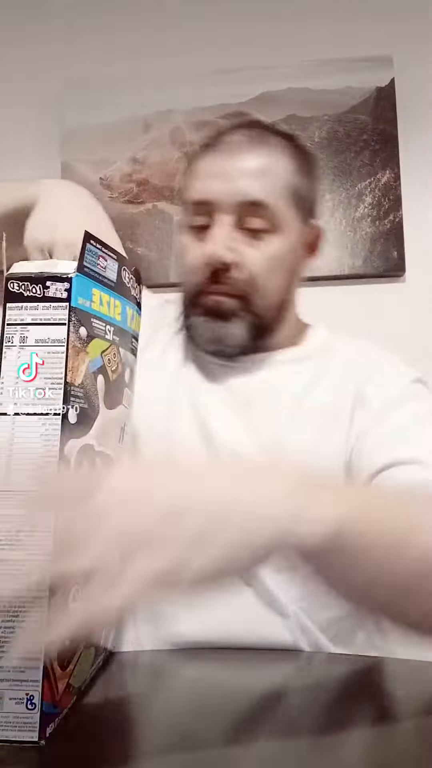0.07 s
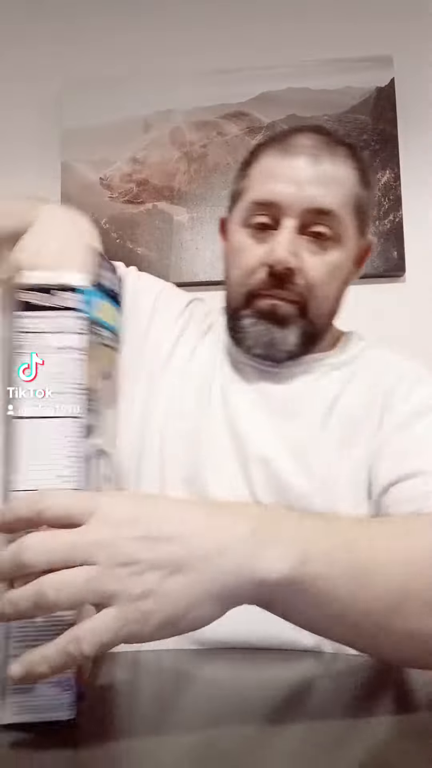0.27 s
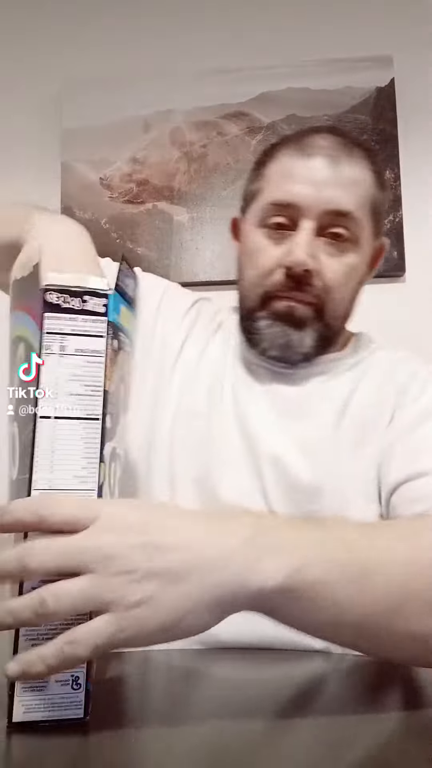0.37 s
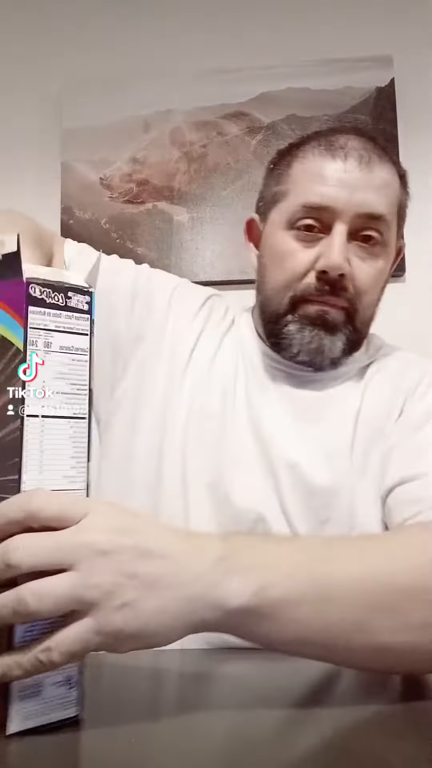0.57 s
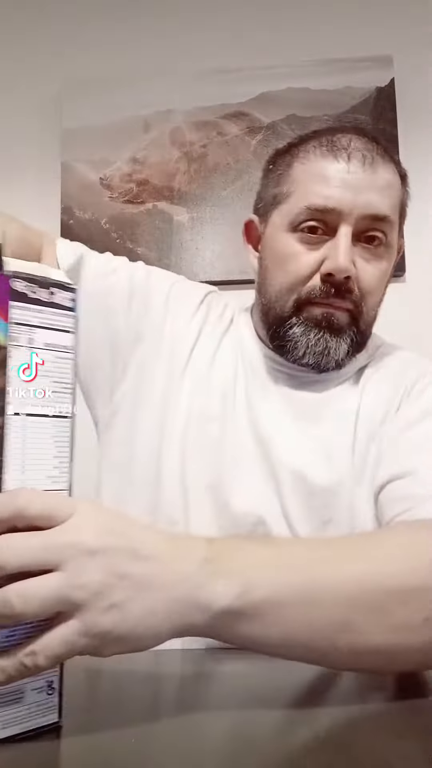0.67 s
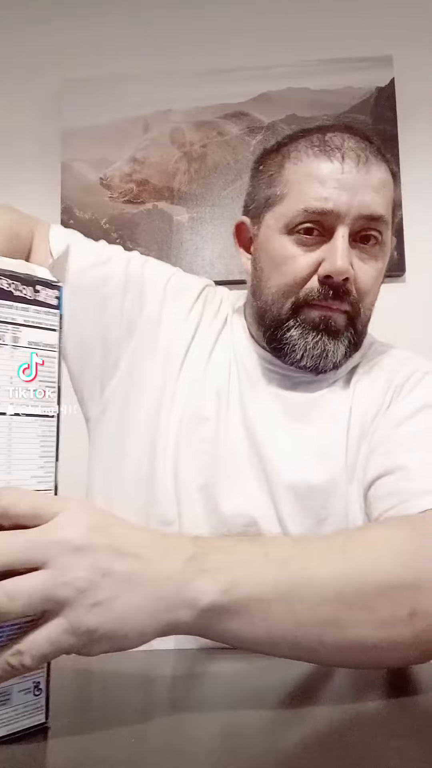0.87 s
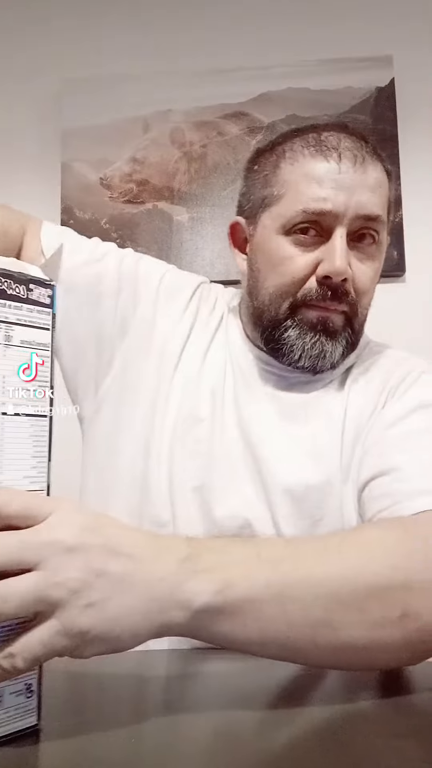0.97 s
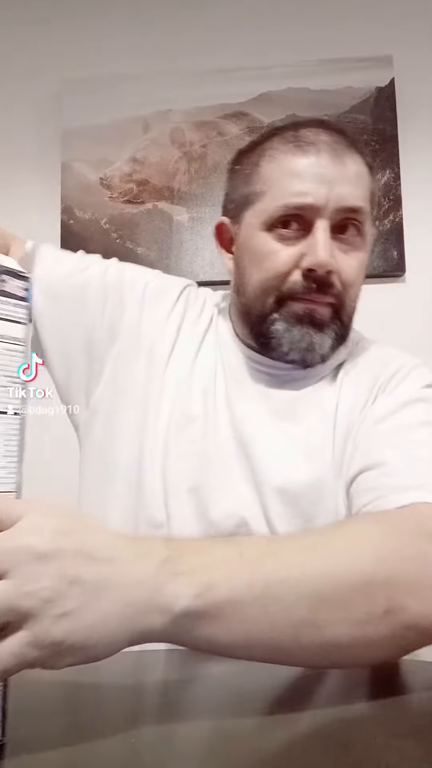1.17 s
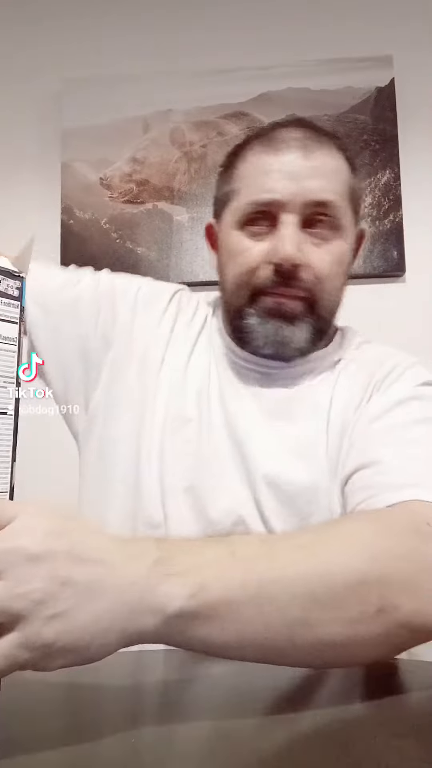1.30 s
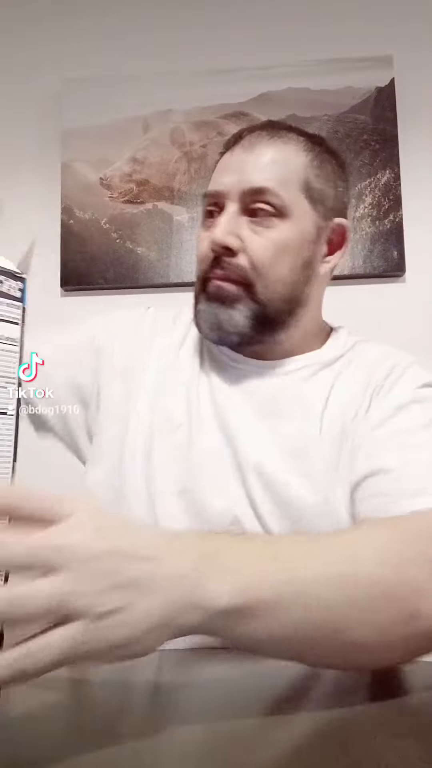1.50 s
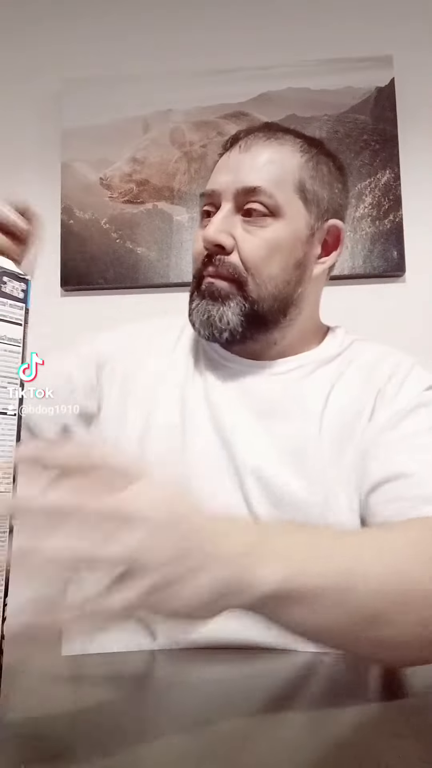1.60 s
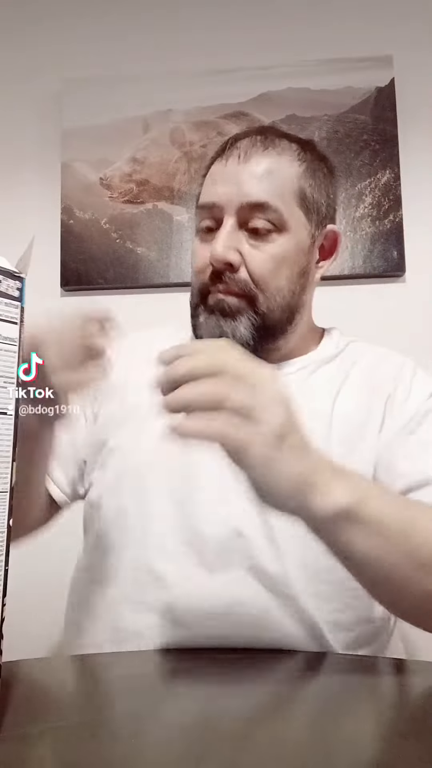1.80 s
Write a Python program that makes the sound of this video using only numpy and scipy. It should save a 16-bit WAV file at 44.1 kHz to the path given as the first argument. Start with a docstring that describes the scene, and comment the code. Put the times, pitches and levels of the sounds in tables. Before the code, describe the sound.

A hand digs through a cereal box, crackling the inner bag and bumping the carton.

```python
"""A cardboard cereal box on a table in a small, quiet room, close to a near-mono stereo microphone.
A hand goes into the plastic liner: creases buckle in a running crackle, cereal patters on the walls
and larger creases snap over. As the hand rummages, the box thuds on the table, cereal and knuckles
bump the carton, and the room rings briefly. By about 1.6 s the hand has pulled out.
Last, something small and hard ticks faintly."""
import sys
import numpy as np
from scipy import signal
from scipy.fft import rfft, irfft
from scipy.io import wavfile
from scipy.ndimage import uniform_filter1d

SR = 44100
rng = np.random.default_rng(int(sys.argv[2]) if len(sys.argv) > 2 else 0)


def generate_wav(signal):
    """Clip the signal to [-1, 1] and save it as 16-bit WAV at the path in sys.argv[1]."""
    frames = np.transpose(np.atleast_2d(signal))
    scaled = np.clip(frames, -1, 1) * 32767
    pcm = np.round(scaled).astype(np.int16)
    wavfile.write(sys.argv[1], SR, pcm)


N = 81585


def undb(db):
    """Decibels to gain."""
    return 10 ** (np.asarray(db) / 20)


def unit(x):
    """Scale to rms 1."""
    return x / np.sqrt(np.mean(x ** 2))


def unit_attack(sound):
    """Scale a short sound to rms 1 over its first 4 ms."""
    return sound / np.sqrt(np.mean(sound[:176] ** 2))


def envelope(table, column):
    """Gain over time from one dB column of a table."""
    rows = np.array(table)
    return undb(np.interp(np.arange(N) / SR, rows[:, 0], rows[:, column]))


def fade(t, t60):
    """Exponential decay by 60 dB in t60."""
    return np.exp(-np.log(1000) * t / t60)


def ring(x, response):
    """Pass a sound through an impulse response scaled to unit energy."""
    return signal.fftconvolve(x, response / np.linalg.norm(response))[:N]


def bin_gains(points, size):
    """Gain at each FFT bin from (frequency [Hz], level [dB]) points."""
    hz, db = np.array(points).T
    return undb(np.interp(np.log(np.fft.rfftfreq(size, 1 / SR) + 1), np.log(hz), db))


def colour(x, points, size=4096):
    """Minimum-phase filter with the spectral shape of the points."""
    cepstrum = irfft(np.log(bin_gains(points, size)))
    cepstrum[1:size // 2] *= 2
    cepstrum[size // 2 + 1:] = 0
    return ring(x, irfft(np.exp(rfft(cepstrum))))


def add(track, start, sound):
    """Mix a sound in at a time in seconds."""
    i = int(np.clip(start * SR, 0, N - 1))
    track[i:i + len(sound)] += sound[:N - i]


def steady(x, size=1100):
    """Hold the average strength near 1 and keep the fine grain."""
    power = np.abs(uniform_filter1d(uniform_filter1d(x ** 2, size), size // 2))
    return x / np.sqrt(power + np.mean(x ** 2) / 20)


def room(x, wet_db, t60=.28, gap_s=.006, patterns=16):
    """Direct sound at the microphone, then a small room whose echoes shift as the hand moves."""
    t, place = np.arange(N // 4) / SR, np.linspace(0, patterns - 1, N)
    tail = fade(t, t60) * (t > gap_s)
    wet = np.zeros(N)
    for k in range(patterns):
        crossfade = np.sqrt(np.maximum(1 - np.abs(place - k), 0))
        wet += ring(x * crossfade, rng.standard_normal(len(t)) * tail)
    return (x + undb(wet_db) * wet) / np.hypot(1, undb(wet_db))


# Spectrum of the background at the microphone (frequency [Hz], relative level [dB])
ROOM_TONE_SPECTRUM = [(25, -7), (70, 1.5), (130, 0), (250, 5.5), (450, -3.5), (1000, -15), (5000, -14),
                      (8000, -30.5), (12500, -7), (16000, -15.5)]


def room_tone(level_db=-78.5):
    """The quiet room: a steady low murmur with a thin hiss."""
    return undb(level_db) * colour(rng.standard_normal(N), ROOM_TONE_SPECTRUM)


# Rustle of the liner around the hand (time [s], relative crunch level [dB], relative treble level [dB])
RUSTLE_LEVELS = [(0, -61.5, -62), (0.04, -55, -59.5), (0.1, -45.5, -40), (0.18, -53.5, -57),
                 (0.25, -43.5, -43), (0.295, -30.5, -32.5), (0.39, -33, -32), (0.49, -38.5, -39.5),
                 (0.57, -33.5, -30), (0.635, -27.5, -38), (0.68, -32, -31.5), (0.735, -30, -25.5),
                 (0.83, -40, -49), (0.91, -38, -37), (1.0, -44.5, -44.5), (1.05, -49, -47),
                 (1.1, -46.5, -50.5), (1.23, -40, -42.5), (1.3, -37.5, -45), (1.355, -48.5, -41),
                 (1.42, -26.5, -29.5), (1.46, -45.5, -48), (1.505, -70, -43), (1.55, -46.5, -76.5),
                 (1.63, -78, -87.5)]


def crackle(per_s=1500, spread_db=2.8, t60=.008, count=4000, size=500):
    """Many small creases buckle, each a brief burst of its own strength; gives crunch and treble."""
    grain, t = np.zeros(N), np.arange(size) / SR
    starts = np.cumsum(rng.exponential(size=count)) / per_s
    strengths = undb(spread_db * np.minimum(rng.exponential(size=count), 4))
    bursts = rng.standard_normal((count, size)) * fade(t, t60)
    for start, strength, burst in zip(starts, strengths, bursts):
        if start < N / SR:
            add(grain, start, burst * strength)
    grain = steady(grain)
    crunch = grain * envelope(RUSTLE_LEVELS, column=1) * undb(-4)
    treble = grain * envelope(RUSTLE_LEVELS, column=2) * undb(-5)
    return crunch, treble


# Jostling of the box (time [s], relative patter level [dB], rumble level [dB])
JOSTLE_LEVELS = [(0, -66, -69), (0.1, -44, -74), (0.185, -54.5, -66), (0.22, -43.5, -64), (0.3, -32, -42),
                 (0.41, -34.5, -50.5), (0.48, -31.5, -44), (0.58, -30, -40), (0.64, -32, -42),
                 (0.685, -34.5, -47), (0.73, -22.5, -40), (0.79, -37.5, -49), (0.89, -34, -41),
                 (0.96, -36.5, -52), (1.03, -33, -46.5), (1.1, -44, -51), (1.2, -36, -63),
                 (1.3, -40.5, -53.5), (1.43, -35.5, -60), (1.51, -38, -46), (1.56, -60, -65),
                 (1.65, -82.5, -81)]
# Spectrum of the cardboard walls (frequency [Hz], relative level [dB])
WALL_SPECTRUM = [(70, -45.5), (170, -8.5), (240, -8.5), (320, 0), (480, 2), (700, 2), (1000, -1.5),
                 (1400, -9), (3000, -12), (8000, -41.5)]
# A low room mode at 137 Hz, then the box's own modes (frequency [Hz], relative level [dB], t60 [s])
ROOM_AND_BOX_MODES = [(137, -12, .35), (246, -12, .12), (402, -9, .1), (494, -9, .1), (568, -10, .13),
                      (652, -11, .13), (702, -11, .13), (905, -11, .13)]
# The table's rumble, with the room mode's peak at 137 Hz (frequency [Hz], relative level [dB])
RUMBLE_SPECTRUM = [(25, -25.5), (45, -4), (65, -4), (90, -2), (108, -10.5), (122, -12), (137, 6.5),
                   (150, -6), (170, -12), (230, 3.5), (320, -8.5), (1000, -81)]


def jostle(hits_per_s=600, spread_db=2.5, modes_db=-8):
    """Cereal patters on the walls, ringing the box and a low room mode; the table rumbles under it."""
    strengths = undb(spread_db * np.minimum(rng.exponential(size=N), 4))
    hits = (rng.random(N) < hits_per_s / SR) * strengths * rng.choice([-1, 1], N)
    patter = steady(hits) * envelope(JOSTLE_LEVELS, column=1) * undb(-3.5)
    t = np.arange(N // 3) / SR
    modes = sum(undb(db) * unit(np.sin(2 * np.pi * hz * t) * fade(t, t60))
                for hz, db, t60 in ROOM_AND_BOX_MODES)
    rattle = colour(patter, WALL_SPECTRUM) + undb(modes_db) * ring(patter, modes)
    rumble = colour(rng.standard_normal(N), RUMBLE_SPECTRUM) * envelope(JOSTLE_LEVELS, column=2)
    return room(rattle, wet_db=-3) + rumble


# Larger creases snapping over
# (time [s], relative crunch level [dB], relative treble level [dB], pitch of the film patch [Hz])
CREASE_SNAPS = [(0.087, -40.5, -46, 3060), (0.155, -55, -52, 3800), (0.199, -39.5, -48, 6580),
                (0.208, -40, -34, 4860), (0.215, -41.5, -37.5, 2310), (0.267, -29.5, -33, 2230),
                (0.307, -30.5, -31, 5000), (0.402, -47, -44, 1630), (0.424, -34.5, -32, 4600),
                (0.453, -33.5, -38, 2170), (0.526, -28, -33.5, 3200), (0.55, -43, -32.5, 3400),
                (0.555, -36, -38, 2090), (0.581, -28, -37, 1780), (0.591, -48, -26.5, 1880),
                (0.613, -28.5, -31, 2190), (0.618, -50, -25.5, 4660), (0.627, -28.5, -24, 3050),
                (0.63, -50, -26, 1870), (0.669, -40, -32, 2170), (0.683, -37, -45.5, 1780),
                (0.705, -28, -45, 2470), (0.726, -26, -27, 4700), (0.735, -57, -26.5, 1630),
                (0.762, -36, -30, 5700), (0.776, -32, -39, 4260), (0.785, -34, -31, 3070),
                (0.793, -25, -26.5, 5950), (0.797, -39, -33, 1860), (0.857, -27.5, -34, 4230),
                (0.899, -31.5, -53, 1730), (0.909, -46, -33, 1750), (0.917, -33, -36.5, 4600),
                (0.95, -34.5, -47, 1510), (0.959, -35, -41, 2110), (0.97, -35.5, -40.5, 2970),
                (1.026, -38, -39, 1840), (1.036, -31.5, -37, 1680), (1.043, -41, -36, 5300),
                (1.12, -37.5, -61, 1580), (1.143, -39, -43, 3270), (1.204, -40, -37.5, 3970),
                (1.211, -32.5, -36.5, 4200), (1.236, -34, -42, 1830), (1.284, -37, -41, 1490),
                (1.327, -32, -43, 2150), (1.371, -27, -34, 1860), (1.379, -53, -47, 5870),
                (1.397, -28, -26, 3070), (1.407, -33, -40, 2240), (1.409, -53, -27, 2180),
                (1.437, -46, -46, 2180), (1.478, -38, -44, 1640), (1.488, -34, -42.5, 3690),
                (1.604, -90, -60, 3200), (1.748, -75, -76, 5780)]


def snaps(rise_s=.0005, hold_s=.0025, t60=.009, ring_t60=.018, spread_db=.8, size=1300):
    """Each snap is a quick avalanche of clicks that rings a patch of film."""
    crunch, treble, rings = np.zeros((3, N))
    t = np.arange(size) / SR
    rise = 1 - np.exp(-t / rise_s)
    shape = rise * fade(np.maximum(t - hold_s, 0), t60)
    for start, crunch_db, treble_db, hz in CREASE_SNAPS:
        avalanche = rng.standard_normal(size) * undb(spread_db * rng.exponential(size=size))
        snap = unit_attack(shape * avalanche)
        add(crunch, start, snap * undb(crunch_db - .5))
        add(treble, start, snap * undb(treble_db + 1.5))
        partials_hz = rng.uniform(2000, 6000, size=(3, 1))
        patch = np.sin(2 * np.pi * hz * t) + .5 * np.sin(2 * np.pi * partials_hz * t).sum(axis=0)
        add(rings, start, unit_attack(patch * rise * fade(t, ring_t60)) * undb(crunch_db - 5))
    return crunch, treble, rings


# Spectrum of the liner's crunch (frequency [Hz], relative level [dB])
CRUNCH_SPECTRUM = [(500, -32), (900, -2.5), (1300, -1.5), (1700, 5), (2800, -1), (4500, 2), (6300, 0.5),
                   (7000, -7.5), (7700, -20.5), (9500, -25.5), (16000, -44)]
# Spectrum of the liner's fine treble crackle (frequency [Hz], relative level [dB])
TREBLE_SPECTRUM = [(4000, -20.5), (7500, -25.5), (9000, -13.5), (10500, -7), (11700, -0.5), (12600, 0.5),
                   (14000, -5.5), (16000, -16.5)]


def liner():
    """Crackle and snaps take on the colour of the plastic film and spread into the room."""
    crackle_crunch, crackle_treble = crackle()
    snap_crunch, snap_treble, rings = snaps()
    crunch = colour(crackle_crunch + snap_crunch, CRUNCH_SPECTRUM)
    treble = colour(crackle_treble + snap_treble, TREBLE_SPECTRUM)
    return room(crunch + rings, wet_db=-4) + room(treble, wet_db=-6.5)


# The base of the box landing on the table (time [s], peak level before the low cut [dB])
BASE_THUDS = [(0.214, -42), (.29, -63), (0.496, -39), (.625, -57), (.755, -45), (1.03, -35.5),
              (1.41, -41.5)]


def thuds(hz=80, rise_s=.002, t60=.027, size=5000):
    """The carton rocks on its base and thuds softly on the table."""
    out, t = np.zeros(N), np.arange(size) / SR
    thud = np.sin(2 * np.pi * hz * t) * (1 - np.exp(-t / rise_s)) ** 2 * fade(t, t60)
    for start, db in BASE_THUDS:
        add(out, start, undb(db) * thud / np.abs(thud).max())
    return out


# Cereal and knuckles against the carton (time [s], relative level [dB], wall pitch [Hz], t60 [s])
WALL_BUMPS = [(0.223, -35, 247, 0.06), (.292, -26, 550, 0.045), (.458, -27.5, 335, 0.049),
              (0.4893, -24, 450, 0.075), (.499, -14, 428, 0.018), (0.531, -29, 500, 0.026),
              (.62, -24.5, 535, 0.042), (0.643, -21.5, 316, 0.044), (.708, -21.5, 516, 0.0085),
              (.723, -32, 566, 0.033), (0.749, -27.5, 420, 0.036), (.785, -28, 818, 0.09),
              (.867, -38, 730, 0.036), (0.904, -41, 237, 0.12), (.968, -30, 640, 0.034),
              (1.021, -28.5, 436, 0.0091), (1.169, -26, 512, 0.018), (1.188, -28, 540, 0.015),
              (1.289, -29.5, 235, 0.062), (1.333, -26.5, 280, 0.027), (1.37, -27, 446, 0.023)]


def bumps(scuff_db=-8, bass_cut_hz=170, size=3000):
    """A bump flexes a heavily damped wall, with a short scuff; the small wall radiates little bass."""
    out, t = np.zeros(N), np.arange(size) / SR
    bass_cut = signal.butter(1, bass_cut_hz, "high", fs=SR)
    for start, db, hz, t60 in WALL_BUMPS:
        scuff = unit(colour(rng.standard_normal(size), WALL_SPECTRUM)[:size])
        flex = (np.sin(2 * np.pi * hz * t) + undb(scuff_db) * scuff) * fade(t, t60)
        add(out, start, undb(db - 3.5) * unit_attack(signal.lfilter(*bass_cut, flex)))
    return room(out, wet_db=-7.5)


# Spectrum of the last tick (frequency [Hz], relative level [dB])
TICK_SPECTRUM = [(500, -22.5), (1400, -20.5), (2050, -0.5), (2600, -14), (3200, -1), (4100, 5.5),
                 (4700, -4), (5800, -4.5), (7500, -24), (12000, -30), (16000, -35.5)]


def tick(start_s=1.797, level_db=-62, t60=.06, size=5000):
    """Something small and hard ticks faintly, with nearly as much room as direct sound."""
    out, t = np.zeros(N), np.arange(size) / SR
    burst = colour(rng.standard_normal(size) * fade(t, t60), TICK_SPECTRUM)
    add(out, start_s, undb(level_db) * unit_attack(burst))
    return room(out, wet_db=-1)


# Side level by frequency (frequency [Hz], level relative to mid [dB])
STEREO_WIDTH = [(100, -37.5), (500, -23), (1000, -47.5), (4000, -66), (9000, -50.5), (13000, -26.5)]


def scene():
    """Box and room in near mono, slightly wider in the low mids and the top treble."""
    mid = liner() + jostle() + thuds() + bumps() + tick() + room_tone()
    side = irfft(1j * rfft(mid) * bin_gains(STEREO_WIDTH, N), N)  # a quarter cycle ahead of mid
    return np.array([mid + side, mid - side])


def record(dry, low_cut_hz=83, top_hz=15950):
    """The recorder cuts the deep bass and the top."""
    thin = signal.sosfilt(signal.butter(4, low_cut_hz, "high", fs=SR, output="sos"), dry)
    return signal.sosfilt(signal.ellip(12, .2, 80, top_hz, fs=SR, output="sos"), thin)


dry = scene()
out = record(dry)
generate_wav(out)
```